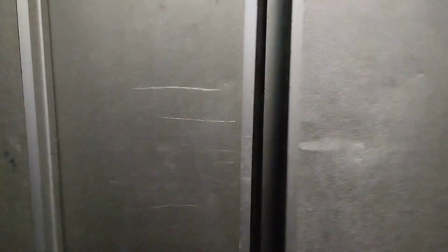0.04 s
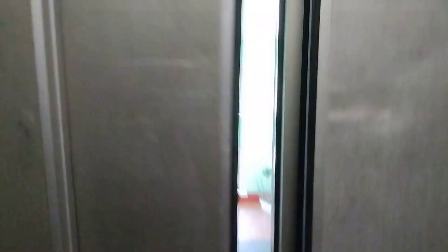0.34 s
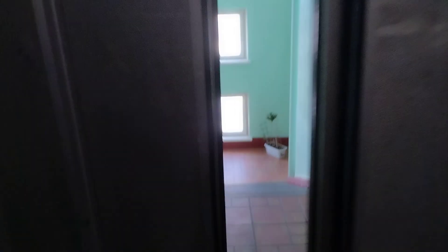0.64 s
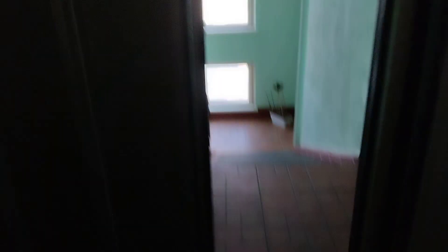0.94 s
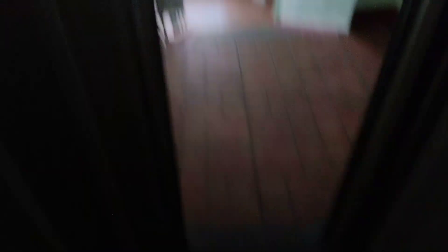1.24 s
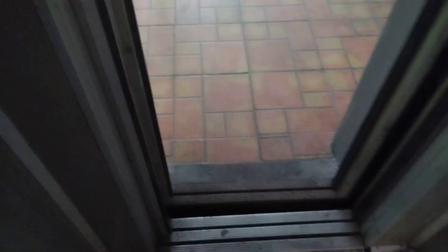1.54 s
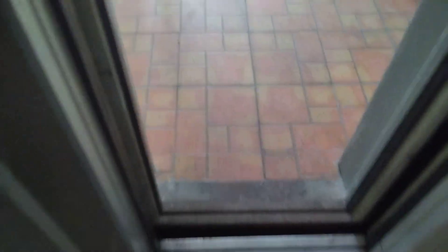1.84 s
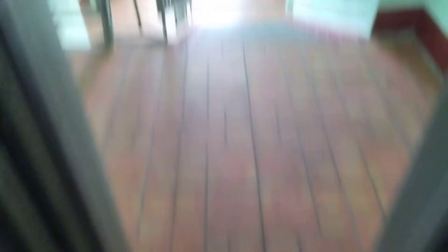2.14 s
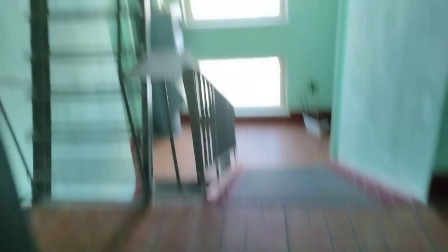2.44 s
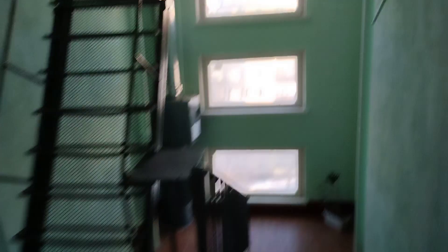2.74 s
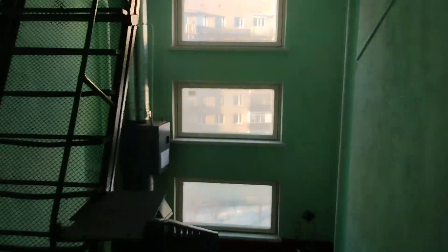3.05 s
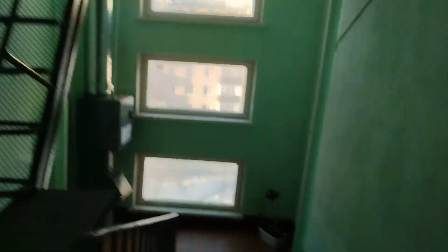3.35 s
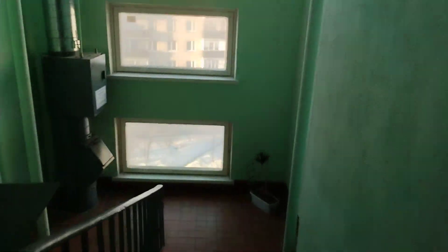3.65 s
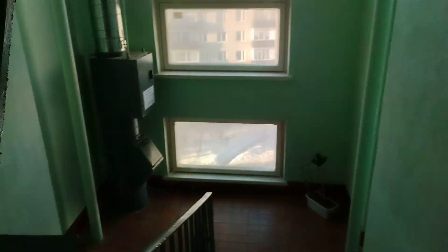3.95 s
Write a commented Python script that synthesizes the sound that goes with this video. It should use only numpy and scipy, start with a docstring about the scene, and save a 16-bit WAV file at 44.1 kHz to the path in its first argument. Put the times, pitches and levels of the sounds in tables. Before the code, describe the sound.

Steel lift doors unlatch and slide open with clacks, rubbing and small squeaks over a low motor hum, heard from inside the car. They knock to a stop, echoing in a stairwell, then clothes swish and fingers bump the microphone.

```python
"""Old steel lift doors unlatch, heard from inside the car. The motor hums and shakes the car
while the doors rattle, rub and squeak along their track. At about two seconds they knock against
the end stop, the tiled stairwell echoes and the motor dies down. Then someone steps out on to the
landing: clothes swish, a sole scuffs the tiles and fingers bump the microphone."""
import sys
import numpy as np
from scipy import signal
from scipy.fft import rfft, irfft
from scipy.io import wavfile

SR = 44100
rng = np.random.default_rng(int(sys.argv[2]) if len(sys.argv) > 2 else 0)


def materialize(psi):
    """Save the field psi as 16-bit PCM at rate SR to the path in sys.argv[1].

    A 1-D psi becomes a single channel; in a 2-D psi each row is a channel.
    """
    bounded = np.clip(np.atleast_2d(psi).T, -1, 1)
    quanta = np.round(bounded * 32767).astype(np.int16)
    wavfile.write(sys.argv[1], SR, quanta)


N = 176400
T = np.arange(N) / SR

# A "colour" says how strong each pitch is; "t60" is the time a sound takes to fade by 60 dB.
# colour of the background hiss, with the microphone's bright ring near 8.4 kHz: f/Hz, level/dB
HISS_COLOUR = [(20, 9), (60, 3.5), (130, -3.5), (300, -8), (600, -12.5), (1200, -15.5), (2200, -14),
               (3200, -21.5), (4500, -19), (6200, -21.5), (8400, -12.5), (10500, -19), (12000, -27),
               (16000, -31)]
# strength of the door motor, and of the car's slow sway: t/s, level/dB
MOTOR_LEVEL = [(0, -30.5), (.35, -29.5), (.55, -32.5), (.76, -36.5), (.93, -29.5), (1.1, -39), (1.4, -37),
               (1.62, -33), (1.8, -36.5), (2.08, -34.5), (2.2, -49), (2.55, -47.5), (2.85, -71)]
SWAY_LEVEL = [(0, -35), (.46, -26.5), (.58, -30), (.66, -24.5), (.8, -44), (1, -33), (1.36, -38.5),
              (1.7, -41), (1.97, -33), (2.12, -47), (2.3, -38.5), (2.65, -37.5), (2.9, -53), (3.5, -54.5),
              (4, -50)]
# tones of the motor's hum, colours of the car's shake and sway: f/Hz, level/dB
HUM_TONES = [(56.8, -5.5), (95.5, -9.5), (113, -13.5), (179, -19)]
SHAKE_COLOUR = [(20, -9), (38, -3), (52, 11), (66, 12.5), (82, 5), (105, -10), (140, -27), (250, -51),
                (600, -85)]
SWAY_COLOUR = [(3, -71), (14, -25), (22, -7), (28, 5.5), (38, -3.5), (55, -17), (150, -47)]

# a sole scuffs the tiles, a sleeve brushes past: t/s, rise/s, hold/s, t60/s, level/dB
SOLE_STROKES = [(3, 0.17, 0.049, 0.22, -57)]
SLEEVE_STROKES = [(3.765, .02, .065, .14, -45)]
# swishes of clothing: t/s, rise/s, hold/s, t60/s, level/dB, sizzle level/dB
SWISHES = [(2.111, 0.0076, 0.05, 0.19, -41.5, -39), (2.254, 0.0084, 0.073, 0.3, -46, -53),
           (2.377, 0.21, 0.3, 0.62, -46, -67), (3.046, 0.041, 0.063, 0.94, -52, -79),
           (3.4, 0.0027, 0.0052, 0.2, -39.5, -41.5), (3.449, 0.016, 0.013, 0.024, -56, -48),
           (3.643, 0.05, 0.028, 0.33, -39, -37), (3.751, 0.035, 0.04, 0.37, -39.5, -70),
           (3.925, 0.026, 0.053, .4, -52, -64)]
# small ticks from clothing and from fingers on the microphone's case: t/s, t60/s, level/dB
SMALL_TICKS = [(2.591, 0.019, -37), (2.995, 0.026, -43), (3.123, .021, -45), (3.247, .021, -45.5),
               (3.4105, 0.0047, -34), (3.429, 0.0063, -29.5), (3.953, 0.015, -38.5), (3.977, .02, -38.5)]
# colours of the sole, the sleeve and the cloth's high sizzle: f/Hz, level/dB
SOLE_COLOUR = [(60, -20), (170, 2), (400, -5), (1500, 2), (2300, -2), (3500, -16), (7000, -35)]
SLEEVE_COLOUR = [(3500, -31), (4800, -13), (5400, 2), (7000, 0), (8200, 0), (11000, -35)]
SIZZLE_COLOUR = [(4000, -11), (8000, 6), (10500, 3.5), (13000, -4), (16000, -5)]
# colour of the cloth, with the microphone's bright ring near 8.4 kHz: f/Hz, level/dB
CLOTH_COLOUR = [(100, 3), (600, -11), (1200, -9), (2200, -7.5), (3200, -8.5), (4600, -7.5), (6500, -6.5),
                (8400, 3.5), (10000, -5), (12000, -13), (16000, -18)]
# fingers on the microphone's case: t/s, click level/dB, thump level/dB, snap level/dB
FINGER_BUMPS = [(3.4022, -20.5, -34, -18), (3.5338, -35.5, -56, -60), (3.6476, -32, -46, -70),
                (3.674, -60, -29, -60), (3.797, -35, -26.5, -55)]

# rollers groan, hangers and doors squeak as they stick: t/s, hold/s, f/Hz, width/Hz, level/dB
SQUEAKS = [(0.09, .008, 3370, 250, -44), (0.097, 0.025, 1346, 250, -38.5), (0.11, 0.029, 4460, 110, -37.5),
           (.126, .02, 8330, 120, -39), (0.128, 0.044, 5450, 600, -38), (0.131, 0.046, 4740, 450, -40.5),
           (0.258, 0.048, 1586, 35, -37), (0.276, .012, 1110, 90, -35), (0.418, 0.057, 535, 60.4, -38),
           (0.626, 0.075, 783, 244, -43), (1.696, 0.013, 1470, 170, -43), (1.699, 0.014, 3880, 150, -52),
           (1.731, .004, 1510, 150, -46), (1.977, 0.048, 428, 60, -45)]
# rollers running on the track, doors rubbing the sill: t/s, level/dB
ROLL_LEVEL = [(0, -37), (.22, -44), (.32, -37.5), (.47, -38), (.6, -41.5), (.69, -40), (.76, -47),
              (.96, -46.5), (1.17, -43), (1.5, -47), (1.82, -46.5), (2.06, -48), (2.3, -52), (2.7, -52),
              (3, -63), (4, -69.5)]
RUB_LEVEL = [(0, -43.5), (.22, -50), (.31, -36), (.5, -36), (.6, -44), (.78, -54), (.94, -56),
             (1.08, -45.5), (1.22, -44), (1.44, -42.5), (1.62, -49), (1.74, -47.5), (1.82, -54.5),
             (2.05, -49.5), (2.4, -57.5), (4, -85)]
# their colours, the rubbing with the microphone's bright ring near 8.4 kHz: f/Hz, level/dB
ROLL_COLOUR = [(60, -13), (130, 16), (230, 3.5), (400, 2), (650, -0.5), (1100, -6.5), (1700, -8),
               (2200, -1.5), (3000, -22), (6000, -20), (16000, -33.5)]
RUB_COLOUR = [(500, -28), (2300, -1), (3200, 1.5), (4400, 0.5), (5300, -0.5), (6400, -5), (8400, 4.5),
              (10000, -0.5), (12500, -7), (16000, -11.5)]
# tones of the steel doors, plus the microphone's own high ring near 8.4 kHz: f/Hz, width/Hz, level/dB
RING_TONES = [(181.5, 8.4, -10), (261, 8.4, 6), (398, 30, 4.5), (432, 14, 1), (521.4, 10, 5.5),
              (558, 21, 7.5), (720, 8.5, 3.5), (821, 9.2, 2), (1099, 41, 6), (1199, 20, -3.5),
              (1344, 15, 0), (1590, 11, -7), (1796, 45, -2), (1894, 24, 3.5), (4200, 24, -9),
              (4440, 20, -15), (6250, 28, -9), (6700, 30, 0), (8400, 28, 7)]
# a small steel catch drops; a door hits its end stop and bounces: t/s, level/dB
CATCH_HITS = [(.536, -39), (.8065, -33)]
STOP_HITS = [(1.976, -32.5), (2.01, -29.5)]
# tones that the catch and the end stop ring with: f/Hz, level/dB, t60/s
CATCH_TONES = [(3970, -2, 0.095), (4689, -6, .17), (4900, -6, 0.17), (6110, -10, 0.15), (7550, -11, 0.1),
               (8300, -4, .11), (9200, -1, 0.089), (9840, -0.5, .14), (10500, -11, .13)]
STOP_TONES = [(915, -5, 0.08), (1028, -17, 0.19), (1486, -20, 0.18), (1745, -4, 0.13), (1799, 1, 0.086),
              (1920, -9, 0.14), (2196, -17, .2)]
# the car booms when a door catches or reaches the end stop: t/s, t60/s, level/dB
CAR_BOOMS = [(.015, 0.23, -27.5), (1.135, 1, -40.5), (1.928, 0.16, -30), (1.972, 0.17, -35.5),
             (2.013, 0.49, -37), (2.222, 0.83, -43)]
# colours of that boom and of the door's frame, panel, hanger and latch: f/Hz, level/dB
BOOM_COLOUR = [(60, -7), (115, -6.5), (165, 7.5), (190, 5.5), (250, -6.5), (400, -16), (1000, -80)]
FRAME_COLOUR = [(60, -29), (130, 5), (200, 0), (280, 4), (420, 4.5), (560, 0), (750, 2), (1500, -49)]
PANEL_COLOUR = [(300, -47.5), (620, -0.5), (1000, 3), (1700, 1), (2300, 0.5), (2900, -11), (3800, -18),
                (8000, -61)]
HANGER_COLOUR = [(1500, -50), (2800, 1.5), (3300, -8), (4000, 1), (5600, -0.5), (6400, -2), (7200, -9),
                 (8500, -20), (16000, -44)]
LATCH_COLOUR = [(4000, -50), (6500, -8), (7700, 4), (8700, 2.5), (9700, -5), (11000, -11.5), (12500, -15),
                (16000, -53)]
# door clacks: t/s, rise/s, t60/s, frame level/dB, panel level/dB, hanger level/dB, latch level/dB,
# hanger f/Hz, latch f/Hz, ringing compared with chatter/dB
DOOR_CLACKS = [(0.0174, 0.00094, 0.13, -41, -28, -24.5, -26, 5500, 7760, -2),
               (0.092, .014, 0.25, -55, -33.5, -37, -57, 4000, 8400, 7),
               (0.114, 0.02, 0.3, -35.5, -61, -36, -33.5, 4400, 8500, 2),
               (.231, 0.008, 0.12, -44, -39.5, -33, -35.5, 3820, 8250, -2),
               (0.2485, 0.006, 0.24, -38, -27, -24, -27, 4000, 8800, -4),
               (0.29, 0.016, 0.31, -32.5, -37, -59, -42, 4450, 8600, 2),
               (0.3811, 0.0029, 0.21, -51, -29.5, -26, -39, 4180, 8260, -2.5),
               (0.534, 0.0031, 0.35, -45, -47.5, -36.5, -35.5, 4560, 9900, 1),
               (0.626, .008, 0.11, -43, -50, -53, -48, 4200, 8400, -7),
               (0.804, 0.0035, 0.19, -34.5, -41.5, -33, -31.5, 4670, 9400, 4),
               (1.032, 0.0055, 0.16, -56, -49, -67, -46.5, 4150, 8400, -3),
               (1.489, 0.004, 0.13, -45, -45, -36.5, -44.5, 4570, 8440, 2),
               (1.69, 0.013, 0.1, -70, -44, -43, -39, 4000, 8250, -8),
               (1.772, 0.003, 0.15, -64, -43, -50.5, -63, 4400, 8400, -3),
               (1.8394, 0.001, 0.13, -39, -33, -34, -34.5, 3280, 8600, -5),
               (1.893, 0.0068, 0.19, -46, -46, -47, -45, 5200, 8400, -6),
               (1.923, 0.01, .16, -35.5, -38, -53, -60, 5200, 8400, -8),
               (1.9633, 0.0031, 0.16, -31.5, -34, -38, -30.5, 5460, 8450, -14),
               (2.008, 0.011, 0.24, -38, -43, -44.5, -47.5, 5260, 8340, 1),
               (2.2199, 0.0041, 0.11, -56, -37, -31, -25.5, 6900, 9050, 1.5)]


def from_db(db):
    """Turn decibels into a number to multiply by."""
    return 10 ** (np.asarray(db) / 20)


def unit_level(x):
    """Scale a sound so that its average strength (rms) is 1."""
    return x / np.sqrt(np.mean(x ** 2) + 1e-20)


def level(rows):
    """A volume curve through points of t/s, level/dB."""
    return from_db(np.interp(T, *np.transpose(rows)))


def white():
    """White noise: an even hiss."""
    return rng.standard_normal(N)


def coloured(x, colour):
    """Give a noise a colour, at strength 1."""
    hz, db = np.transpose(colour)
    f = np.maximum(np.fft.rfftfreq(N, 1 / SR), 1)
    gain = from_db(np.interp(np.log(f), np.log(hz), db))
    return unit_level(irfft(rfft(x) * gain, N))


def drift(hz):
    """A random wobble of strength 1, mostly slower than hz."""
    f = np.fft.rfftfreq(N, 1 / SR)
    return unit_level(irfft(rfft(white()) / (1 + (f / hz) ** 2), N))


def grains(per_s, grain_db):
    """Tiny random clicks over a smooth rubbing hiss."""
    clicks = (rng.random(N) < per_s / SR) * white()
    return unit_level(white() + from_db(grain_db) * unit_level(clicks))


def resonance(x, hz, width_hz):
    """Make a sound ring at one pitch; a narrower width rings longer."""
    r = np.exp(-np.pi * width_hz / SR)
    feed = np.sqrt((1 - r * r) / 2) * np.array([1, 0, -1])
    feedback = [1, -2 * r * np.cos(2 * np.pi * hz / SR), r * r]
    return signal.lfilter(feed, feedback, x + 1e-18)


def envelope(start, rise, hold, t60):
    """A volume curve that rises, holds and fades away."""
    out = np.zeros(N)
    span = slice(max(int(start * SR), 0), int((start + rise + hold + 2 * t60) * SR))
    t = T[span] - start
    fade = np.exp(-np.log(1000) * np.maximum(t - rise - hold, 0) / t60)
    out[span] = np.clip(t / max(rise, 1e-4), 0, 1) * fade
    return out


def background_hiss():
    """A faint, nearly steady noise."""
    return from_db(-51.5 + 0.37 * drift(16)) * coloured(white(), HISS_COLOUR)


def echoes(x, t60, dull_hz):
    """Sound bounces between walls and dies away, the treble first; the bass leaks out."""
    t = T[:SR]
    noise = signal.sosfilt(signal.butter(2, 450, "high", fs=SR, output="sos"), rng.standard_normal(SR))
    low = signal.sosfilt(signal.butter(2, dull_hz, fs=SR, output="sos"), noise)
    fade = np.exp(-np.log(1000) * t / t60)
    tail = (low * fade + .5 * (noise - low) * fade ** 2) * (t > .003)
    return signal.fftconvolve(x, tail / np.linalg.norm(tail))[:N]


def motor():
    """The door motor gives a wavering hum and shakes the car, which also sways."""
    waver_db, waver_hz = 3.5, .7
    hum = 0
    for hz, db in HUM_TONES:
        gain = from_db(db + waver_db * drift(11)) * np.sqrt(2)
        pitch = hz + waver_hz * drift(3.9)
        hum += gain * np.sin(2 * np.pi * np.cumsum(pitch) / SR)
    shake = from_db(2) * coloured(white(), SHAKE_COLOUR)
    sway = level(SWAY_LEVEL) * coloured(white(), SWAY_COLOUR)
    return level(MOTOR_LEVEL) * (hum + shake) + sway


def brushing(strokes, colour):
    """A sole or sleeve slides over a surface with a smooth hiss."""
    motion = sum(from_db(db) * envelope(*timing) for *timing, db in strokes)
    return motion * coloured(white(), colour)


def clothes():
    """Cloth slides over cloth, sizzling when fast; clothing and fingers on the microphone tick."""
    motion, sizzle = 0, 0
    for *timing, db, sizzle_db in SWISHES:
        swish = envelope(*timing)
        motion += from_db(db) * swish
        sizzle += from_db(sizzle_db) * swish
    ticks = sum(from_db(db) * envelope(start, 0, 0, t60) for start, t60, db in SMALL_TICKS)
    cloth = coloured(grains(per_s=2500, grain_db=-6), CLOTH_COLOUR)
    flutter = from_db(drift(25))
    return flutter * ((motion + ticks) * cloth + sizzle * coloured(white(), SIZZLE_COLOUR))


def finger_bumps():
    """A finger on the microphone's case gives a bright snap, a dull click and a low thump."""
    click_hz, thump_hz, case_hz = 445, 60, 176
    bright_noise = unit_level(white() + resonance(white(), hz=8600, width_hz=1700))
    out = 0
    for start, click_db, thump_db, snap_db in FINGER_BUMPS:
        t = np.clip(T - start, 0, .5)
        snap = envelope(start, 0, 0, t60=.0022) * bright_noise
        click = np.sin(2 * np.pi * click_hz * t) * np.exp(-np.pi * 370 * np.minimum(t, .05))
        case = from_db(-9.5) * np.sin(2 * np.pi * case_hz * t) * envelope(start, 0, 0, t60=.03)
        thump = np.sin(2 * np.pi * thump_hz * t) * np.exp(-np.pi * 28 * t)
        out += from_db(snap_db) * snap + from_db(click_db) * (click + case) + from_db(thump_db) * thump
    return out


def squeaks():
    """A part sticks and slips, ringing for a moment with a wandering pitch."""
    steadiness = 0.82  # 1 would even out the tone's strength completely
    out = 0
    for start, hold, hz, width, db in SQUEAKS:
        ring = resonance(resonance(white(), hz, width), hz, width)
        strength = np.abs(signal.hilbert(ring)) + 1e-9
        tone = unit_level(ring / strength ** steadiness)
        out += from_db(db) * envelope(start, rise=.004, hold=hold, t60=.077) * tone
    return out


def door_ringing(force):
    """A push sets the steel doors ringing with many tones; the microphone adds its own high ring."""
    ring = sum((-1) ** k * from_db(db) * resonance(force, hz, width)
               for k, (hz, width, db) in enumerate(RING_TONES))
    return ring / np.sqrt(sum(from_db(db) ** 2 for _, _, db in RING_TONES))


def panel_rattle(effort):
    """Loose panels touch at random, louder when the rollers work harder."""
    touches_per_s, t60 = 28, 0.058
    touches = (rng.random(N) < touches_per_s / SR) * rng.uniform(0, 1, N)
    fade_per_sample = np.exp(-np.log(1000) / (t60 * SR))
    bursts = unit_level(signal.lfilter([1], [1, -fade_per_sample], touches + 1e-18))
    return from_db(-12.5) * effort * bursts * coloured(white(), PANEL_COLOUR)


def sliding():
    """Rollers judder along a gritty track; the doors ring under the load, rattle and rub the sill."""
    effort, full_effort = level(ROLL_LEVEL), from_db(-34.5)
    load = effort * from_db(1.83 * drift(28))
    rollers = load * coloured(grains(per_s=390, grain_db=-1), ROLL_COLOUR)
    force = load * (effort / full_effort) ** 0.95 * white()
    ringing = from_db(-1) * door_ringing(force)
    rattle = panel_rattle(effort)
    rub_gain = level(RUB_LEVEL) * from_db(1.43 * drift(23))
    rub = rub_gain * coloured(grains(per_s=900, grain_db=-4.5), RUB_COLOUR)
    return rollers + ringing + rattle + rub


def struck_steel(hits, tones):
    """A steel part rings after each hit, its mix of tones a little different every time."""
    spread_db = 1.5
    out = 0
    for start, hit_db in hits:
        for hz, db, t60 in tones:
            gain = from_db(hit_db + db + spread_db * rng.standard_normal())
            tone = np.sin(2 * np.pi * (hz * T + rng.random()))
            out += gain * envelope(start, rise=.0012, hold=0, t60=t60) * tone
    return out


def car_booms():
    """The heaviest knocks make the whole car boom."""
    knocks = sum(from_db(db) * envelope(start, rise=.0047, hold=0, t60=t60)
                 for start, t60, db in CAR_BOOMS)
    return knocks * coloured(white(), BOOM_COLOUR)


def clacks():
    """Each blow sets frame, panel, hanger and latch chattering and makes the doors ring."""
    frame, panel, hanger, latch = [coloured(grains(per_s=800, grain_db=-1.5), colour) for colour
                                   in (FRAME_COLOUR, PANEL_COLOUR, HANGER_COLOUR, LATCH_COLOUR)]
    out, force, noise = 0, 0, white()
    for (start, rise, t60, frame_db, panel_db, hanger_db, latch_db,
         hanger_hz, latch_hz, ring_db) in DOOR_CLACKS:
        crack = 0.51 * envelope(start, 0, 0, t60=.0064)
        blow = envelope(start, rise, 0, t60) + crack
        chatter = from_db(frame_db) * frame + from_db(panel_db) * panel
        ring_gain = from_db(ring_db)
        for part, db, hz in ((hanger, hanger_db, hanger_hz), (latch, latch_db, latch_hz)):
            ring = ring_gain * resonance(noise, hz, width_hz=720)
            chatter += from_db(db) * (part + ring) / np.hypot(1, ring_gain)
        out += blow * chatter
        kick = signal.unit_impulse(N, int((start + rise) * SR))
        force += from_db(panel_db) * np.linalg.norm(blow) * kick
    return out + from_db(-3) * door_ringing(force)


def scene():
    """The doors echo in the small car and the stairwell, then someone leaves; both channels alike."""
    doors = clacks() + car_booms() + struck_steel(STOP_HITS, STOP_TONES)
    doors += struck_steel(CATCH_HITS, CATCH_TONES) + sliding() + squeaks()
    car_gain = from_db(-16)
    in_car = (doors + car_gain * echoes(doors, t60=.1, dull_hz=9230)) / np.hypot(1, car_gain)
    landing = from_db(-15.5) * echoes(in_car, t60=.98, dull_hz=2280)
    background = background_hiss() + motor()
    person = clothes() + brushing(SLEEVE_STROKES, SLEEVE_COLOUR)
    person += brushing(SOLE_STROKES, SOLE_COLOUR) + finger_bumps()
    return np.tile(background + person + landing + in_car, (2, 1))


def record(dry):
    """A steep filter cuts off the very highest treble."""
    cutoff_hz = 16000
    return signal.sosfilt(signal.ellip(12, .2, 80, cutoff_hz, fs=SR, output="sos"), dry)


dry = scene()
out = record(dry)
materialize(out)
```